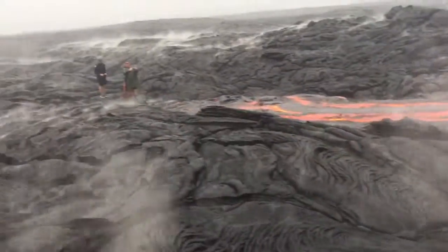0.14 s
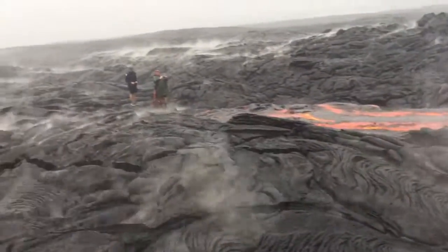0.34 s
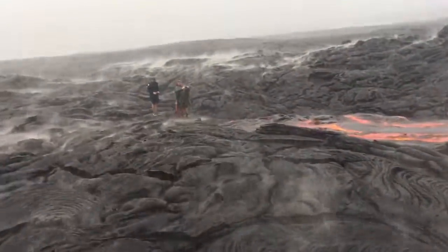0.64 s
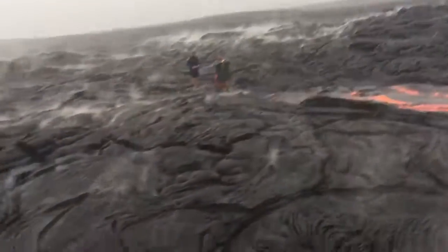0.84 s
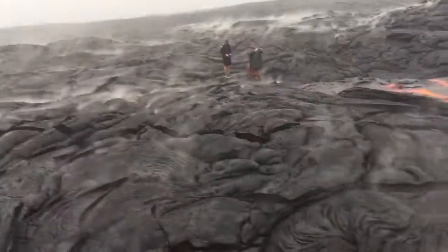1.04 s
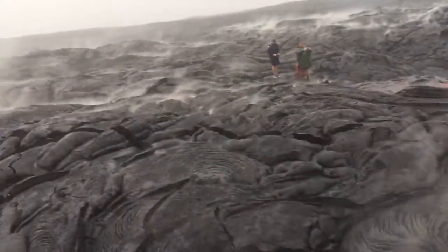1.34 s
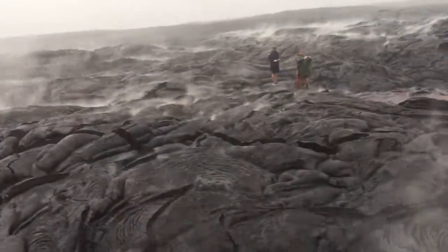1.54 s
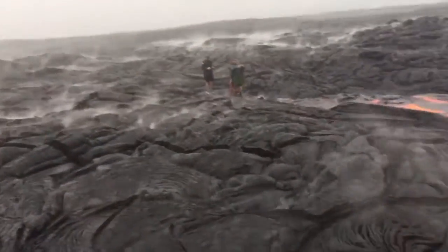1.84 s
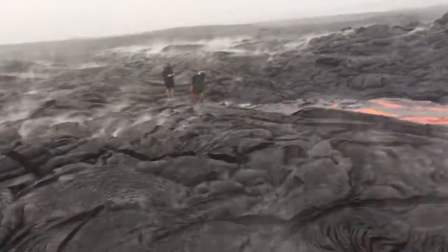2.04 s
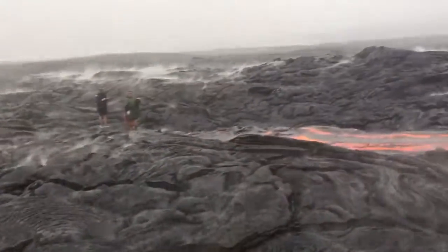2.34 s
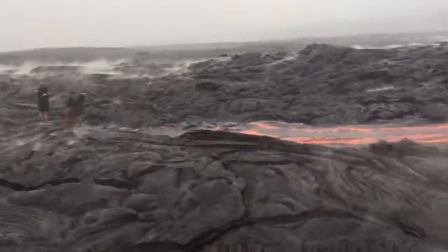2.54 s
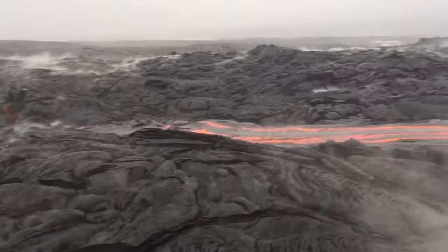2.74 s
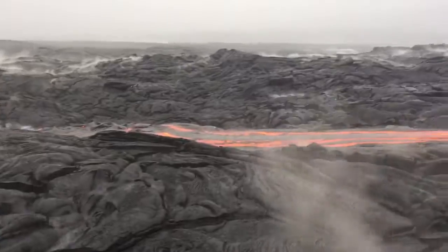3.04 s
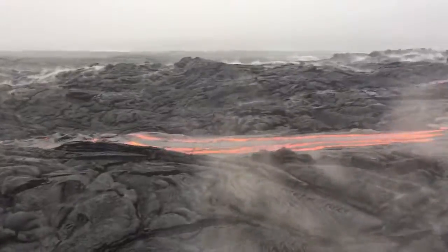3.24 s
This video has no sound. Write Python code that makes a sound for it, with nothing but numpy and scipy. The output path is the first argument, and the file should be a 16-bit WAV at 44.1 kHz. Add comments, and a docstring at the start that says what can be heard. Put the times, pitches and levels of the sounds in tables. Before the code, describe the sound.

Cooling lava crust crackles for about 3.4 seconds: dry, bright, glassy snaps over dense tiny ticks and steady airy hiss. Snaps crowd around 0.75-1.0 s, strong ones pop near 1.7 s, they thin after 2.65 s and pick up from 3.2 s. Low wind rumbles unevenly, thumping the microphone around 0.6, 1.0-1.4, 1.9, 2.6-2.8 and 3.2-3.3 s. Open outdoor ground, close and nearly echo-free, mono.

```python
"""Open, windy ground, where a lava flow cools. Its glassy crust snaps in sharp cracks close by,
over a patter of small ticks and the hiss of the whole field. Gusts buffet the microphone.
Each snap is a jolt that rings a flake, knocks the crust and clicks brightly; the hiss and the wind
are coloured noises that follow level curves, and each buffet is a few slowing swings of pressure.
"""
import sys
import numpy as np
from scipy import signal
from scipy.fft import rfft, irfft, next_fast_len
from scipy.io import wavfile
from scipy.ndimage import uniform_filter1d

SR = 44100
rng = np.random.default_rng(int(sys.argv[2]) if len(sys.argv) > 2 else 0)


def wav_out(sig):
    """Save sig, one row per channel (or a flat mono array), as 16-bit PCM at SR to the path in sys.argv[1]."""
    wavfile.write(sys.argv[1], SR, np.round(np.clip(np.atleast_2d(sig).T, -1, 1) * 32767).astype(np.int16))


N = 149499  # length in samples

# Names in _TRIM_DB are offsets added to the levels of a table or setting.
# Spectrum tables give a shape only: each sound is levelled after it is coloured.

# Wind rumble on the microphone, before its trim: start_s, level_db [s, dB]
GUST_LEVEL = [(0, -22.5), (.08, -28.5), (.21, -29.5), (.29, -27), (.37, -30.5), (.44, -20), (.56, -30.5),
              (.64, -20.5), (.72, -28), (.76, -21), (.84, -35), (.93, -21.5), (1.02, -24.5), (1.1, -26),
              (1.18, -25), (1.23, -32), (1.37, -21.5), (1.42, -42.5), (1.59, -38.5), (1.63, -30),
              (1.79, -23.5), (1.87, -37.5), (1.92, -26.5), (1.99, -35), (2.03, -27), (2.1, -35),
              (2.4, -26.5), (2.47, -35), (2.6, -22), (2.68, -28.5), (2.85, -26), (2.92, -43), (2.94, -22.5),
              (3.05, -31.5), (3.16, -31.5), (3.22, -27.5), (3.28, -27.5), (3.33, -18.5), (3.39, -23)]
# Upper, fluttering part of the wind, before its trim: start_s, level_db [s, dB]
FLUTTER_LEVEL = [(0.0, -27.5), (0.08, -45.5), (0.25, -44), (0.31, -39), (0.56, -36), (0.59, -24.5),
                 (0.83, -41.5), (0.87, -28.5), (0.94, -40), (1.01, -26.5), (1.06, -32.5), (1.38, -31.5),
                 (1.43, -57), (1.59, -38.5), (1.66, -32.5), (1.78, -36), (1.82, -46), (1.93, -30),
                 (1.98, -50), (2.1, -41), (2.6, -41.5), (2.62, -32), (2.67, -45), (2.735, -47),
                 (2.755, -25), (2.79, -38), (2.92, -57), (2.94, -37.5), (3.06, -52), (3.22, -35),
                 (3.25, -39.5), (3.32, -24.5), (3.39, -30)]
# Colour of the rumble: pitch_hz, relative level_db [Hz, dB]
RUMBLE_SPECTRUM = [(15, -40), (25, -12), (40, -4), (55, 5), (85, 6.5), (130, -1.5), (200, -10),
                   (320, -24.5), (700, -92)]
# Colour of the flutter: pitch_hz, relative level_db [Hz, dB]
FLUTTER_SPECTRUM = [(10, -69), (60, 2), (140, 0.5), (200, -3), (280, -4), (400, -14.5), (700, -24.5),
                    (1500, -50), (5000, -100)]
# Colour of the steady wind over the field: pitch_hz, relative level_db [Hz, dB]
AIR_SPECTRUM = [(10, -51), (30, 3), (80, 3), (200, -4.5), (400, -16.5), (800, -41), (2000, -49)]
RUMBLE_TRIM_DB, FLUTTER_TRIM_DB, FLUTTER_ROUGH_DB, AIR_DB = 0.52, -1, 4, -47.5

# Bustle of the crust, heard as its hiss, before its trim: start_s, level_db [s, dB]
ACTIVITY = [(0.0, -38.5), (0.52, -39), (0.8, -38), (1.1, -41.5), (1.37, -37.5), (2.0, -38), (3.0, -40),
            (3.39, -40.5)]
# Colour of the hiss: pitch_hz, relative level_db [Hz, dB]
HISS_SPECTRUM = [(200, -9.5), (400, -6.5), (1310, -12.5), (2400, -11), (2750, -7), (3050, -2.5),
                 (3550, -8.5), (4050, -7), (4950, -19.5), (6950, -27.5), (7750, -34), (9320, -35.5),
                 (10400, -41), (15500, -42)]
HISS_TRIM_DB, HISS_FLICKER_DB = -3, 0.85

# Small ticks: average rate, base level, and how far chance lifts it
TICKS_PER_S, SMALL_DB, SMALL_SPREAD_DB, SMALL_MAX_LIFT_DB = 200, -43, 3.5, 8
# Pitch and width of their ring; the spreads are in natural-log units
SMALL_HZ, SMALL_PITCH_SPREAD, SMALL_WIDTH_HZ, SMALL_WIDTH_SPREAD = 3130, 0.22, 860, 0.55
# Their knock and bright tick, before the trims shared with the cracks
SMALL_KNOCK_DB, KNOCK_SPREAD_DB, SMALL_TICK_DB, TICK_SPREAD_DB = -5, 4.5, -28.5, 7
FLURRY_GAIN, FLURRY_S = 0.2, 0.05  # crowding around each near crack, and its fade time

# Near cracks, before the trims: start_s, level_db, flake pitch_hz, resonance width_hz,
# knock_db and tick_db relative to the level [s, dB, Hz, Hz, dB, dB]
CRACKS = [(0.1332, -30.5, 3100, 1200, -10, -20.5), (0.1472, -29.5, 3270, 400.0, -6, -20),
          (0.1677, -29, 2930.0, 1300.0, -5.5, -29), (0.2057, -29, 2900, 900.0, -21, -21),
          (0.2452, -24, 3140, 1600.0, -16, -30), (0.2487, -23.5, 2980, 600.0, -5.5, -24),
          (0.2752, -24, 3860, 700.0, -7, -25), (0.387, -28.5, 3270, 400.0, -15, -22),
          (0.408, -29, 3800, 907, -4, -20), (0.4151, -20, 2780, 1700.0, -27, -27),
          (0.502, -33.5, 3350.0, 1600.0, -13, -7.5), (0.5295, -24.5, 2830.0, 1300.0, -2, -17.5),
          (0.5404, -28, 3900, 700, -3, -23), (0.5664, -30, 3500, 1500, -3, -22),
          (0.6106, -27, 3630, 1600.0, -31, -27), (0.6435, -26, 3380, 810, -6.5, -18.5),
          (0.6484, -27, 3100, 300, -19, -33), (0.6584, -32, 3000, 1600, -2.5, -16),
          (0.6971, -29, 3000, 400.0, -13, -38), (0.7013, -27.5, 3630, 904.4, -3, -24),
          (0.748, -22, 3720, 800, -13, -29), (0.7607, -28, 3630, 900.0, -17, -27),
          (0.7727, -27, 3200, 2200, -2, -25), (0.784, -18.5, 3220, 800.0, -10, -30),
          (0.7927, -23.5, 3250, 1000.0, -8.5, -19), (0.8015, -24, 2780, 600, -15, -28),
          (0.8106, -19.5, 3030, 600, -13.5, -31), (0.821, -25, 2770, 400.0, -12, -31),
          (0.827, -28, 2700, 400, -13, -36), (0.833, -24, 3032, 1600.0, -6, -43),
          (0.883, -28, 2940, 400.0, -11.5, -43), (0.8975, -33, 3200, 800, -12, -28),
          (0.9327, -28.5, 2740.0, 1100.0, -1.5, -22), (0.9446, -23, 3420, 1500.0, -8, -29),
          (0.9753, -20, 3700, 780, -9.5, -28), (0.988, -22, 3480, 1600.0, -15, -25),
          (1.0134, -33.5, 3200, 900, -9, -23), (1.0233, -36.5, 2900, 1100, -4, -21),
          (1.0701, -25.5, 3230, 1200.0, -9.5, -20), (1.149, -33.5, 2896, 2000, -1.5, -18),
          (1.197, -25.5, 3120, 2610, -4.5, -24), (1.2169, -25, 3056, 1300.0, -6.5, -25),
          (1.227, -24, 3120, 793.6, -6, -31), (1.2635, -28.5, 3440, 1100.0, -4, -19),
          (1.2933, -27.5, 2870.0, 600.0, -2.5, -17.5), (1.297, -25.5, 3730, 1000.0, -12, -33),
          (1.3067, -25.5, 2860, 400.0, -10, -29), (1.3613, -27, 2810.0, 800.0, -4, -39),
          (1.3779, -31.5, 3190.0, 1600.0, -16, -39), (1.4143, -30, 3550, 900, -10, -36),
          (1.4315, -35, 2900, 1100, -1, -29), (1.4905, -33.5, 3000, 1600, 0.5, -16.5),
          (1.569, -32, 2690, 700.0, -4.5, -43), (1.609, -22.5, 2922, 400.3, -9, -31),
          (1.6556, -29, 3110.0, 400.0, -6, -13.5), (1.6722, -18.5, 3690, 260, -12, -20),
          (1.7205, -17, 3150, 396, -8, -30.5), (1.7667, -32, 3340, 400.5, -20, -37),
          (1.8107, -24, 3480, 700.0, -14, -13.5), (1.8276, -34, 3200, 400.0, -3, -10),
          (1.8326, -29.5, 3550, 600.0, -6, -20), (1.8559, -32.5, 3160, 400, -16, -32),
          (1.9583, -24.5, 3897, 1570, -6, -26), (2.0046, -24, 3150, 1702, -6.5, -31),
          (2.1209, -28, 3120, 1300, -2.5, -20), (2.132, -23.5, 3304, 800.0, -12, -26),
          (2.163, -29.5, 3439, 500.0, -8, -27), (2.225, -24.5, 2980, 2550, -1.5, -16.5),
          (2.2338, -27.5, 3050, 500, -9, -27), (2.344, -23.5, 3000, 1782, -6, -15),
          (2.3576, -30, 2690.0, 2600.0, -1, -13.5), (2.4255, -31, 2828, 1600.0, 0.5, -35),
          (2.4305, -22.5, 2840, 2600.0, -2.5, -17.5), (2.4902, -32, 3193, 700.0, -19, -15),
          (2.5267, -23.5, 2832, 985, -3.5, -19.5), (2.5302, -26.5, 3430, 800.0, -11, -24),
          (2.5615, -29.5, 3200, 600.0, -4.5, -36), (2.593, -28, 2920, 400.0, 1.5, -35),
          (2.599, -28.5, 2840, 1900.0, 0.5, -17.5), (2.6213, -28.5, 2950, 1300.0, 0, -20.5),
          (2.7411, -32.5, 2970, 901, -6.5, -31), (2.8188, -31, 3087, 400, -22, -41),
          (3.0185, -30, 3480, 1096, -10, -22), (3.1099, -22, 3000, 412, -11.5, -28.5),
          (3.1312, -31.5, 2700, 699, -2.5, -27), (3.2352, -23.5, 2820, 1300.0, -10, -20.5),
          (3.256, -23, 3200, 1500, -10, -27), (3.319, -20, 3660, 898, -17, -27),
          (3.3355, -25, 3240, 397, -9, -15.5), (3.3462, -24, 3240.0, 2600.0, -3.5, -28),
          (3.373, -31, 2920.0, 900.0, -2.5, -34)]
# Colour laid over every flake's ring, peaking near 3 and 4 kHz: pitch_hz, relative level_db [Hz, dB]
RING_SPECTRUM = [(400, -38.5), (1200, -2.5), (2300, -4), (2700, -1), (3030, 4), (3500, -3), (4000, 1),
                 (4400, -4.5), (4950, -12), (7000, -18.5), (10000, -40)]
# Colour of the low knock: pitch_hz, relative level_db [Hz, dB]
KNOCK_SPECTRUM = [(150, -29.5), (450, -0.5), (950, 5.5), (1550, 9.5), (2200, 9), (3200, -5), (6000, -68.5)]
# Colour of the bright tick: pitch_hz, relative level_db [Hz, dB]
TICK_SPECTRUM = [(2000, -27), (4500, -2.5), (5600, 7.5), (6900, 4.5), (7800, -3), (9400, -5),
                 (10400, -12.5), (15500, -12.5)]
CRACK_TRIM_DB, KNOCK_TRIM_DB, TICK_TRIM_DB = 2.07, 1, 5
SPLINTER_SHARE, SPLINTER_S = 0.17, 0.00048  # tiny fractures trailing each snap, and their fade time
SCATTER_DB, SCATTER_T60_S = -11.5, 0.029  # sound thrown back by the rough ground
# Each bright tick also rings a tiny chip at a random pitch
CHIP_LOW_HZ, CHIP_HIGH_HZ, CHIP_WIDTH_HZ, CHIP_SHARE = 4900, 14700, 1200, 1.35

# Single eddies that thump the microphone, before their trim:
# start_s of the peak, peak level_db, pitch_hz at the peak [s, dB, Hz]
BUFFETS = [(0.601, -14.5, 146), (0.622, -16, 190), (0.663, -18, 74.6), (0.998, -16, 153),
           (1.028, -13, 81.6), (1.167, -17.5, 90), (1.185, -17.5, 180), (1.254, -11.5, 109.1),
           (1.314, -13.5, 115), (1.348, -14, 123), (1.368, -17, 126), (1.698, -17.5, 189.8),
           (1.908, -12.5, 72), (2.029, -19, 137), (2.628, -11.5, 147), (2.764, -10, 140),
           (3.213, -16.5, 130), (3.226, -14.5, 103), (3.326, -14.5, 178)]
BUFFET_TRIM_DB = 1
BUFFET_LEAD_CYCLES, BUFFET_CYCLES = 1.51, 0.95  # onset ahead of the peak; spread of the swings

LOW_CUT_HZ, CUTOFF_HZ = 28, 16000


def from_db(db):
    """Decibels to gain."""
    return 10 ** (np.asarray(db) / 20)


def rms_one(x):
    """Scale to rms 1."""
    return x / np.sqrt(np.mean(x ** 2) + 1e-20)


def in_time(rows):
    """A control curve at every sample."""
    s, value = np.transpose(rows)
    return np.interp(np.arange(N) / SR, s, value)


def drift(rate_hz):
    """Smooth random wander with spread 1: noise through two equal low-pass poles."""
    step = 40  # samples between control points
    pole = np.exp(-2 * np.pi * rate_hz * step / SR)
    raw = rng.standard_normal(N // step + 2002)
    slow = signal.lfilter([1], [1, -2 * pole, pole ** 2], raw)[2000:]  # skip the filter's start
    return np.interp(np.arange(N) / step, np.arange(len(slow)), rms_one(slow))


def gains(spectrum, size):
    """Gain of a spectrum table at each bin, drawn along log frequency."""
    hz, db = np.transpose(spectrum)
    bin_hz = np.arange(size // 2 + 1) * SR / size
    return from_db(np.interp(np.log(bin_hz + 1), np.log(hz), db))


def causal(spectrum, size):
    """Minimum-phase response with this spectrum, so that a hit starts at once."""
    cepstrum = irfft(np.log(gains(spectrum, size)))
    cepstrum[1:size // 2] *= 2
    cepstrum[size // 2 + 1:] = 0
    return np.exp(rfft(cepstrum))


def noise(spectrum):
    """Coloured noise of rms 1."""
    size = 2 * next_fast_len(N // 2 + 1)
    white = rfft(rng.standard_normal(size))
    return rms_one(irfft(white * gains(spectrum, size))[:N])


def evened(x, window_s):
    """Hold the short-term level of a noise near 1."""
    power = uniform_filter1d(x ** 2, int(window_s * SR))
    return x / np.sqrt(power + 1e-3)


def wind():
    """Eddies rumble on the microphone under a ragged, higher flutter and the steady wind of the field."""
    rumble_gain = from_db(in_time(GUST_LEVEL) + RUMBLE_TRIM_DB)
    rumble = rumble_gain * evened(noise(RUMBLE_SPECTRUM), window_s=0.0506)
    flutter_db = in_time(FLUTTER_LEVEL) + FLUTTER_TRIM_DB + FLUTTER_ROUGH_DB * drift(27.6)
    flutter = from_db(flutter_db) * evened(noise(FLUTTER_SPECTRUM), window_s=0.0348)
    steady = from_db(AIR_DB) * noise(AIR_SPECTRUM)
    return rumble + flutter + steady


def field_hiss(activity_db):
    """The whole field cracking blurs into coloured noise that follows the bustle and flickers a little."""
    level_db = activity_db + HISS_TRIM_DB + HISS_FLICKER_DB * drift(31)
    return from_db(level_db) * noise(HISS_SPECTRUM)


def flurries():
    """Relative rate of small ticks, averaging about 1: they crowd around the near cracks."""
    t = np.arange(0, N, 100) / SR
    crack_s = np.array(CRACKS)[:, :1]
    near = np.exp(-np.abs(t - crack_s) / FLURRY_S).sum(axis=0)
    rate = 1 + FLURRY_GAIN * near
    return in_time(np.column_stack([t, rate / rate.mean()]))


def small_ticks(activity_db):
    """Small flakes let go at random, more often near the cracks and louder where the crust is busy."""
    busy_db = activity_db - activity_db.mean()
    at = np.flatnonzero(rng.random(N) < TICKS_PER_S * flurries() / SR)
    chance = rng.standard_normal((len(at), 6))
    strength = (chance[:, 0] ** 2 + chance[:, 1] ** 2) / 2  # mostly weak, now and then strong
    lift_db = np.minimum(SMALL_SPREAD_DB * strength, SMALL_MAX_LIFT_DB)
    level_db = SMALL_DB + busy_db[at] / 2 + lift_db
    pitch, width, knock, tick = np.clip(chance[:, 2:].T, -1.6, 1.6)
    pitch_hz = SMALL_HZ * np.exp(SMALL_PITCH_SPREAD * pitch)
    width_hz = SMALL_WIDTH_HZ * np.exp(SMALL_WIDTH_SPREAD * width)
    knock_db = SMALL_KNOCK_DB + KNOCK_SPREAD_DB * knock
    tick_db = SMALL_TICK_DB + TICK_SPREAD_DB * tick
    return snaps(np.column_stack([at / SR, level_db, pitch_hz, width_hz, knock_db, tick_db]))


def near_cracks():
    """The crust close by gives way in sharp snaps at set moments."""
    return from_db(CRACK_TRIM_DB) * snaps(CRACKS)


def resonance(f, hz, width_hz):
    """Response of one damped mode, 1 at its top."""
    damping = 1j * f * width_hz
    return damping / (hz ** 2 - f ** 2 + damping)


def jolts(count, size):
    """Spectra of sharp impulses, each with its own splinters and scatter off the rough ground."""
    t = np.arange(size) / SR
    splinters = SPLINTER_SHARE * np.exp(-t / SPLINTER_S)
    tail = from_db(-60 * t / SCATTER_T60_S) * (t > 0.001)
    scatter = from_db(SCATTER_DB) * tail / np.sqrt(np.sum(tail ** 2))
    jolt = rng.standard_normal((count, size)) * (splinters + scatter)
    jolt[:, 0] = 1
    return rfft(jolt)


def snaps(rows, size=1024):
    """Each fracture is a jolt that rings a flake, knocks the crust and ticks with a tiny chip."""
    s, level_db, pitch_hz, width_hz, knock_db, tick_db = np.transpose(rows)[:, :, None]
    f = np.arange(size // 2 + 1) * SR / size
    jolt = jolts(len(rows), size)
    flake = resonance(f, pitch_hz, width_hz)
    chip_hz = rng.uniform(CHIP_LOW_HZ, CHIP_HIGH_HZ, s.shape)
    chip = 1 + CHIP_SHARE * resonance(f, chip_hz, CHIP_WIDTH_HZ)
    parts = ((flake * causal(RING_SPECTRUM, size), 0),
             (causal(KNOCK_SPECTRUM, size), knock_db + KNOCK_TRIM_DB),
             (chip * causal(TICK_SPECTRUM, size), tick_db + TICK_TRIM_DB))
    waves = 0
    for response, part_db in parts:
        part = irfft(jolt * response)
        # level each part by its energy, counted as if spread over 2 ms
        loudness = np.sqrt(np.sum(part ** 2, axis=1, keepdims=True) / (0.002 * SR))
        waves = waves + from_db(level_db + part_db) * part / loudness
    out = np.zeros(N + size)
    starts = np.clip(s[:, 0] * SR, 0, N).astype(int)
    for start, wave in zip(starts, waves):
        out[start:start + size] += wave
    return out[:N]


def buffets():
    """Each eddy hits the microphone abruptly and leaves in a few slowing swings of pressure."""
    out, t = np.zeros(N), np.arange(N) / SR
    for peak_s, peak_db, pitch_hz in BUFFETS:
        age = 1 + (t - peak_s) * pitch_hz / BUFFET_LEAD_CYCLES  # 0 at the onset, 1 at the peak
        at = np.flatnonzero((age > 0) & (age < 10))
        cycles = BUFFET_LEAD_CYCLES * np.log(age[at])  # the logarithm slows the swings
        swell = np.exp(-(cycles / BUFFET_CYCLES) ** 2)
        out[at] += from_db(peak_db + BUFFET_TRIM_DB) * swell * np.cos(2 * np.pi * cycles)
    return out


def scene():
    """Wind, hiss, ticks, cracks and buffets, mixed to one channel."""
    activity_db = in_time(ACTIVITY)
    air = wind() + buffets()
    crust = field_hiss(activity_db) + small_ticks(activity_db) + near_cracks()
    return (air + crust)[None]


def record(dry):
    """The microphone loses the deepest bass; the top is cut steeply."""
    low_cut = signal.butter(4, LOW_CUT_HZ, "high", fs=SR, output="sos")
    top_cut = signal.ellip(10, 0.1, 80, CUTOFF_HZ, fs=SR, output="sos")  # 0.1 dB ripple, 80 dB down
    thinned = signal.sosfilt(low_cut, dry)
    return signal.sosfilt(top_cut, thinned)


dry = scene()
out = record(dry)
wav_out(out)
```